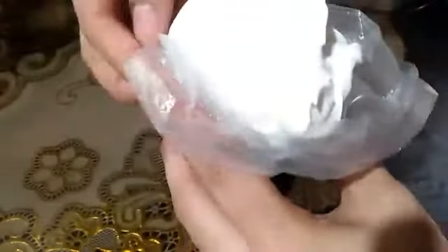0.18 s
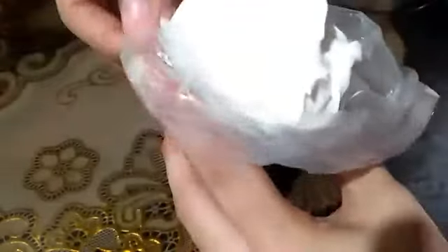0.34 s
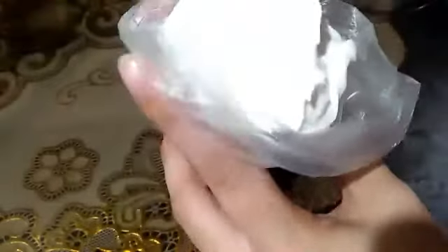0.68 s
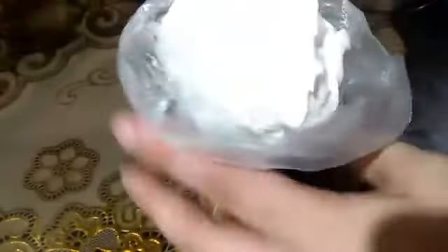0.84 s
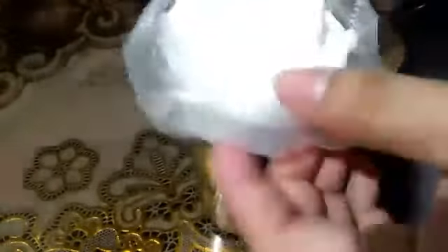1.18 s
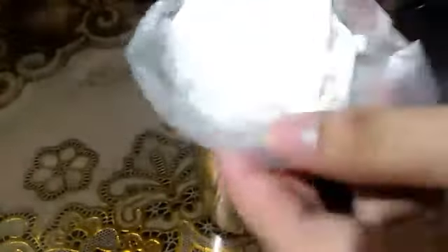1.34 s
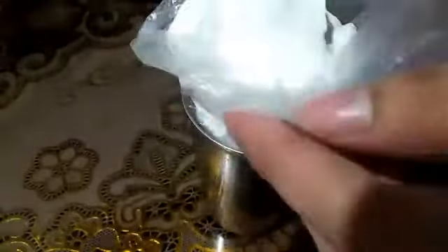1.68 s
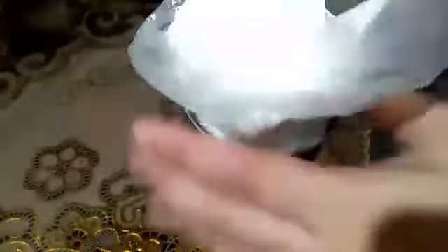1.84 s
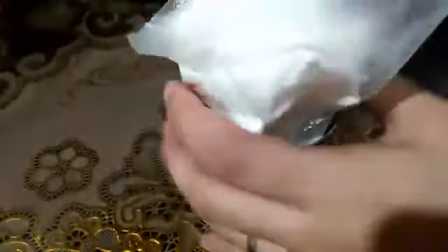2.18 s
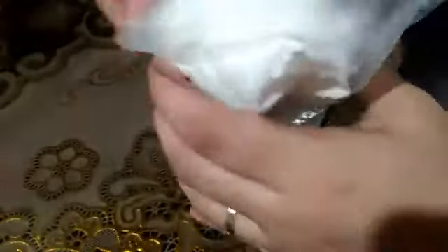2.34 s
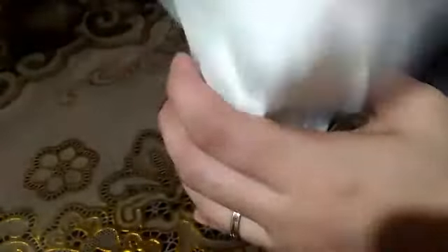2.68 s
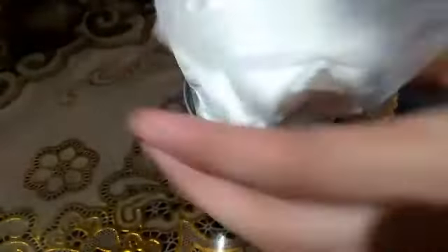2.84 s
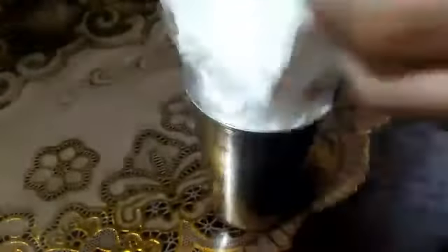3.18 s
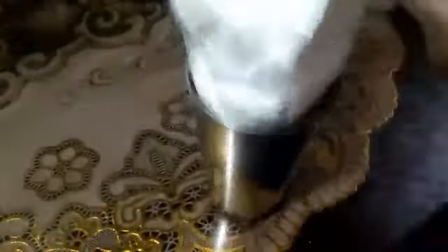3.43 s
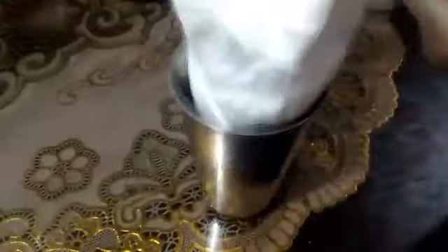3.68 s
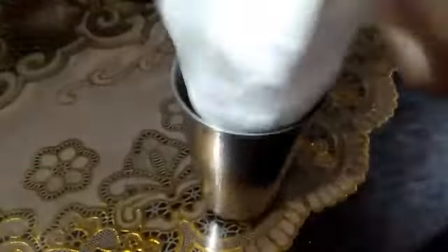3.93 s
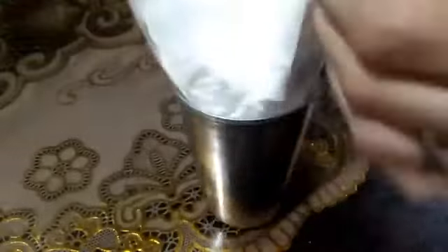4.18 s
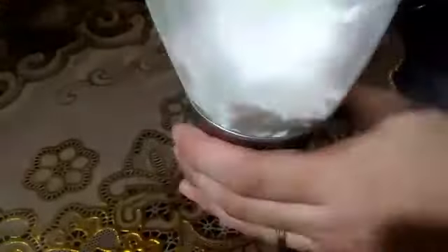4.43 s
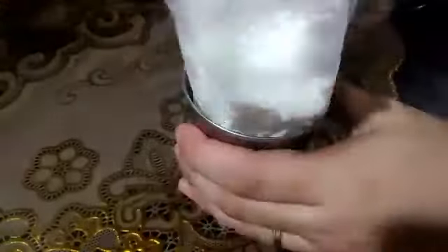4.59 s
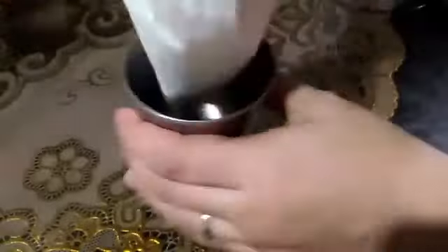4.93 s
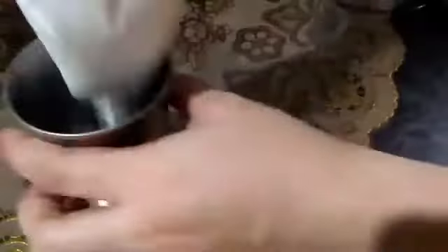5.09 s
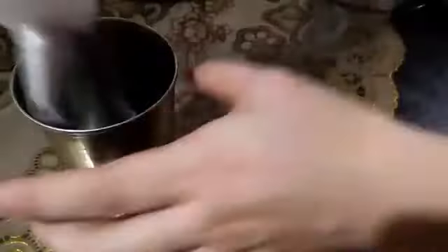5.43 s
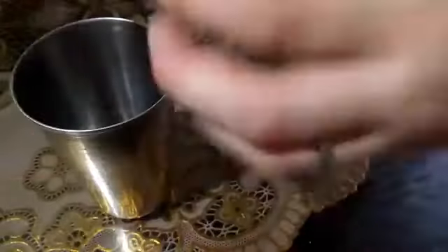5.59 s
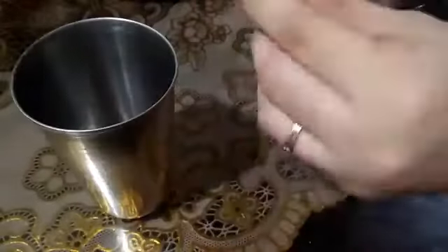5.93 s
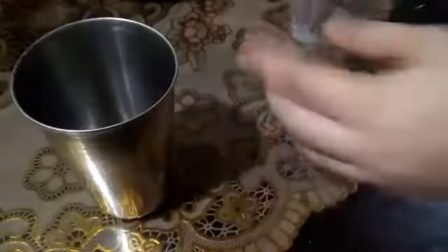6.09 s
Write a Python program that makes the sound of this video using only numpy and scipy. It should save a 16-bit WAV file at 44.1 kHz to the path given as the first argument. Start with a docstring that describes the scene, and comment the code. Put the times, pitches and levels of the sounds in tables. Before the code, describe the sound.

A close, dry sound of thin plastic film in a small quiet kitchen, with barely audible wavering room noise. From 0 to 1.9 seconds the film crackles in short, uneven bursts, bright and crisp, with sharp separate snaps and faint soft finger bumps. Around 2 seconds comes a hard, loud crumple with a low bump, then more scattered crinkles and snaps until 2.9. From about 3.1 to 4.05 the filled bag is gathered in a denser, deeper, smoother rustle, with dull mid-pitched bumps near 3.4 and 3.6. At 4.05 it settles with a soft low thud. Loose crackles follow, then from 4.5 to 5.3 a run of crunchy folds and scraping film, strongest near 5.0. At 5.35 to 5.5 the empty steel cup rocks with short, damped hollow knocks. After a near-silent gap, light crinkles and small snaps continue from 5.8 to the end.

```python
"""In a small, quiet kitchen a thin plastic piping bag of cream is unfolded from the rim of a steel cup,
gathered and pulled out. The film buckles in random swarms of clicked facets, with sharp single snaps and
short crumples. Fingers bump the cup, the bag settles with a thud and the empty cup rocks on the tablecloth:
all damped modes. A near reflection, a short tail and faint, wavering room noise lie around it."""
import sys
import numpy as np
from scipy import signal
from scipy.io import wavfile
from scipy.ndimage import uniform_filter1d

SR = 44100
rng = np.random.default_rng(int(sys.argv[2]) if len(sys.argv) > 2 else 0)


def file_out(sig):
    """Save sig as 16-bit WAV at sys.argv[1]."""
    # one column per channel
    cols = np.atleast_2d(sig).T
    # limit, then scale
    lim = np.clip(cols, -1, 1)
    pcm = np.round(lim * 32767).astype(np.int16)
    wavfile.write(sys.argv[1], SR, pcm)


N = 276943
TIME = np.arange(N) / SR

# Spectrum of the film's crisp crackle. Each row: frequency in Hz, relative level in dB.
CRACKLE_SPECTRUM = [(1500, -47.5), (3000, -18.5), (4500, -11), (6200, -7), (7600, 0), (9000, 5.5),
                    (10500, 1), (12000, -4), (14300, -11.5)]
# Spectrum of free film flexing. Each row: frequency in Hz, relative level in dB.
FLEX_SPECTRUM = [(40, -26), (200, -27), (450, -20), (750, -15.5), (1000, -2.5), (1450, 4), (1850, -4),
                 (2250, -1.5), (3200, -5.5), (4500, -10.5), (8000, -16)]


def rustle(crisp, flex, grip, drag, base_clicks_per_s=2200, base_flexes_per_s=900, full_db=-47,
           crowding=0.6, loose_db=4.0, smoothing=0.52):
    """The harder film is worked, the more facets buckle; loose film goes in clumps, gripped film slides evenly."""
    # Film pressed against the cream sounds deeper. Each row: frequency in Hz, relative level in dB.
    packed_spectrum = [(40, -19.5), (200, -15.5), (300, -7.5), (370, -12), (470, -3.5), (850, 2), (1450, 2),
                       (1950, -0.5), (2600, -5.5), (4000, -29), (8000, -28.5)]
    # Film taut over the rim sounds harder. Each row: frequency in Hz, relative level in dB.
    rim_spectrum = [(200, -30.5), (360, -10.5), (550, -10), (800, -9.5), (1500, -8), (2500, -8.5),
                    (3400, -0.5), (4500, -6.5), (6500, -7), (10000, -21)]

    busy = (crisp / amp(full_db)) ** crowding * (1 + grip) + 0.031
    click_rate = base_clicks_per_s * busy
    flex_rate = base_flexes_per_s * busy
    loose = 1 - smoothing * grip
    clumps = clumping(depth_db=5.0, length_s=0.006) ** loose
    bends = clumps * clumping(depth_db=1.5, length_s=0.0078)

    crackle = swarm(click_rate, loose_db * loose, clumps, CRACKLE_SPECTRUM, ripple_db=3.5, ripple_hz=1180,
                    ring_s=0.00066, flutter=1.36, fold_s=0.007)
    free = swarm(flex_rate, 5.1, bends, FLEX_SPECTRUM, ripple_db=9, ripple_hz=340.3,
                 ring_s=0.0016, flutter=1.2, fold_s=0.014)
    packed = swarm(flex_rate, 2.25, bends, packed_spectrum, ripple_db=3, ripple_hz=296.3,
                   ring_s=0.0017, flutter=1.37, fold_s=0.016)
    taut = swarm(flex_rate, 6.0, clumps, rim_spectrum, ripple_db=8.5, ripple_hz=582,
                 ring_s=0.001, flutter=0.75, fold_s=0.01)

    off_rim = np.sqrt(1 - grip) * free + np.sqrt(grip) * packed
    sheet = np.sqrt(1 - drag) * off_rim + np.sqrt(drag) * taut
    return amp(-0.54) * crisp * crackle + amp(-0.5) * flex * sheet


def handling(column, step_size=22, rise_db_per_s=1100.5, sag_db_per_s=14):
    """Loudness of moving film (column 0 crackle, 1 flexing): short moves, two long slides and crumples."""
    # Fingers work the film. Each row: start in seconds, length in seconds, nominal crackle and flexing in dB.
    moves = [(.005, 0.033, -61.5, -71.5), (.155, 0.0089, -58.5, -69.5), (0.267, 0.034, -66, -79),
             (0.303, 0.073, -55, -65.5), (0.433, 0.062, -53, -65), (0.531, .045, -53, -58.5),
             (0.596, 0.066, -58, -64.5), (0.709, 0.01, -63.5, -66), (0.773, 0.087, -65, -73),
             (0.881, 0.022, -53, -62), (0.955, .04, -65, -70), (1.009, 0.068, -59.5, -63),
             (1.098, 0.053, -46.5, -58), (1.158, 0.027, -55.5, -65), (1.208, 0.028, -53.5, -62),
             (1.276, 0.054, -56, -64.5), (1.341, 0.27, -52.5, -64.5), (1.653, 0.039, -55.5, -69.5),
             (1.797, 0.065, -54, -63), (1.981, 0.028, -48, -48), (2.068, 0.05, -53, -58.5),
             (2.154, 0.038, -58, -62), (2.356, 0.09, -74, -75.5), (2.452, .17, -52, -58),
             (2.657, 0.0086, -55.5, -64), (2.713, 0.077, -54, -56), (2.821, 0.052, -59, -60),
             (2.926, 0.015, -65, -65.5), (4.088, .012, -60, -67), (4.149, 0.025, -70, -72.5),
             (4.217, 0.086, -52, -57), (4.335, .075, -59, -67), (5.352, 0.058, -54.5, -63),
             (5.475, 0.011, -74, -79.5), (5.812, 0.045, -71, -75), (5.863, 0.022, -63.5, -71),
             (5.9, 0.074, -56.5, -64.5), (6.019, 0.078, -62, -69.5), (6.118, 0.038, -68, -84),
             (6.19, 0.062, -62, -65.5)]
    # Bag slides through the hand. Each row: time in seconds, nominal crackle and flexing in dB.
    gather = [(3.06, -64.5, -93), (3.096, -52.5, -63), (3.178, -49.5, -55), (3.202, -50, -43),
              (3.214, -56, -57), (3.59, -46.5, -47.5), (3.804, -48.5, -49), (3.928, -45, -47.5),
              (4.048, -55, -58), (4.085, -71.5, -73)]
    # Bag slides out over the rim. Each row: time in seconds, nominal crackle and flexing in dB.
    lift = [(4.44, -74, -74), (4.5, -70.5, -75.5), (4.525, -54.5, -57.5), (5.0, -55, -61.5),
            (5.11, -63, -74), (5.22, -49, -52.5), (5.285, -59.5, -63.5), (5.32, -71.5, -70)]
    # Whole folds give way; from 4.58 to 5.14 s they come in quick succession as the bag drags over the rim.
    # Each row: middle in seconds, Gaussian width in seconds, nominal crackle and flexing in dB.
    crumples = [(0.558, 0.0082, -45, -50.5), (1.027, 0.011, -47.5, -56.5), (1.134, .006, -52, -65.5),
                (1.852, 0.006, -48, -58), (1.985, 0.0044, -38, -42), (2.005, 0.0046, -42.5, -52),
                (2.069, 0.0039, -46.5, -47), (2.116, 0.0046, -55, -60.5), (2.534, 0.013, -47.5, -48.5),
                (2.948, 0.0031, -49.5, -53), (3.202, 0.0025, -52, -45), (3.42, 0.0052, -58, -44),
                (3.573, 0.0037, -62, -45), (4.262, 0.014, -47, -52), (4.408, 0.005, -52, -53.5),
                (4.58, 0.0022, -44, -56), (4.63, 0.0064, -44.5, -51), (4.699, 0.0099, -46, -55.5),
                (4.769, 0.0087, -44, -47), (4.828, 0.0074, -46, -48.5), (4.885, .015, -46, -50),
                (4.935, 0.0059, -44, -49.5), (4.957, 0.0063, -47, -47.5), (4.995, 0.0036, -40.5, -44),
                (5.023, 0.0091, -41.5, -45.5), (5.081, 0.0083, -45, -49), (5.143, 0.011, -45, -52.5)]
    # Decay after a move. One row: crackle, flexing, both in dB per second.
    fall_db_per_s = (523, 444.5)

    t = TIME[::step_size]
    power = np.zeros(len(t))
    # a move catches quickly, slackens, then dies away
    for start, length, *levels in moves:
        age = t - start
        rise = rise_db_per_s * np.minimum(age, 0)
        sag = sag_db_per_s * (np.clip(age, 0, length) - length / 2)
        fall = fall_db_per_s[column] * np.maximum(age - length, 0)
        power += amp(np.maximum(levels[column] + rise - sag - fall, -130)) ** 2
    for slide in (gather, lift):
        s, *levels = np.transpose(slide)
        power += amp(np.interp(t, s, levels[column], left=-np.inf, right=-np.inf)) ** 2
    for s, width_s, *levels in crumples:
        power += amp(levels[column]) ** 2 * np.exp(-0.5 * ((t - s) / width_s) ** 2)
    return np.interp(TIME, t, np.sqrt(power))


def holding():
    """How the bag is held from moment to moment: grip, and drag over the rim."""
    # Each row: time in seconds, grip on the filled part (0-1), share of flexing from film dragged over the rim (0-1).
    holds = [(0, 0, 0.25), (1.9, 0.16, 0), (1.989, 0.43, 0), (2.2, 0.18, 0.05), (2.6, 0.13, 0.02),
             (3.1, 0.11, 0.02), (3.35, 0.32, 0.03), (3.6, 0.99, 0.24), (4.04, 1, 0), (4.2, 0.4, 0.04),
             (4.5, 0.73, 0.15), (5.0, 0.4, 0.66), (5.35, 0.05, 0), (5.801, 0, 0.02)]
    s, *shares = np.transpose(holds)
    return [np.clip(np.interp(TIME, s, share), 0, 1) for share in shares]


def swarm(clicks_per_s, spread_db, clumps, points, ripple_db, ripple_hz, ring_s, flutter, fold_s,
          even_s=0.056, count=160):
    """Random clicks ring many facets, about half of them the fold in play, which changes about every fold_s."""
    facets = [facet(colour(points, ripple_db, ripple_hz), ring_s, flutter) for _ in range(count)]
    size_db = spread_db * np.minimum(rng.exponential(1, N), 3.5)
    sizes = clumps * amp(size_db) * rng.choice([-1, 1], N)

    fold_number = np.cumsum(rng.random(N) < 1 / (fold_s * SR))
    fold = rng.integers(0, count, N)[fold_number]
    other = rng.integers(0, count, N)
    which = np.where(rng.random(N) < 0.5, fold, other)

    out = np.zeros(N)
    for i in np.flatnonzero(rng.random(N) < clicks_per_s / SR):
        add(out, i / SR, sizes[i] * facets[which[i]])

    # work done on the film sets the mean power, however the clicks share it
    window = signal.windows.hann(int(even_s * SR) | 1)
    power = signal.oaconvolve(out ** 2, window / window.sum(), "same")
    return out / np.sqrt(abs(power) + 1e-6)


def clumping(depth_db, length_s):
    """Facets give way in clumps: a gain that flutters at random."""
    drift = uniform_filter1d(rng.standard_normal(N), max(int(length_s * SR), 1))
    return amp(depth_db * unit(drift))


def facet(tone, ring_s, flutter, size=1024):
    """One buckling facet: a click, then a brief flutter as the bend runs through the sheet; energy 1."""
    age = np.arange(size) / SR / ring_s
    tail = rng.standard_normal(size) * np.sqrt(age) * np.exp(-age)
    tail *= flutter / np.linalg.norm(tail)
    tail[0] += 1
    sound = signal.fftconvolve(tail, tone)[:size]
    return sound / np.linalg.norm(sound)


def snaps(rows, tick_gain_db=10.0, pop_gain_db=16, note_gain_db=18, note_t60_s=0.013,
          usual_flutter_s=0.00094, usual_db=-32, halving_db=9, give_s=0.00092):
    """Creases give and flip: a bright tick, shorter when harder, a sheet pop and the facet's own note."""
    out = np.zeros(N)
    for s, tick_db, pop_db, hz in rows:
        flutter_s = usual_flutter_s * 0.5 ** (max(tick_db - usual_db, 0) / halving_db)
        tick = facet(colour(CRACKLE_SPECTRUM, ripple_db=4.5, ripple_hz=1285), flutter_s, flutter=6.7)
        pop = facet(colour(FLEX_SPECTRUM, ripple_db=4, ripple_hz=392), ring_s=0.0023, flutter=3.6)
        note = ring(hz, note_t60_s, rise_s=0.00062)
        note /= np.linalg.norm(note)
        add(out, s + give_s, amp(tick_db + tick_gain_db) * tick)
        add(out, s + give_s, amp(pop_db + pop_gain_db) * pop)
        add(out, s + give_s, amp(pop_db + note_gain_db) * note)
    return out


def random_snaps(crisp, flex, grip, per_s=40, tick_offset_db=15, pop_offset_db=4.5, spread_db=3,
                grip_db=-5, low_hz=1300, high_hz=3000, above_db=-76, ceiling_db=-53):
    """Rows for snaps(): further creases flip at random while film moves, standing out where it hangs loose."""
    chance = rng.random(N)
    ticks, pops, pitches = rng.uniform(-1, 1, (3, N))
    rows = []
    for i in np.flatnonzero((chance < per_s / SR) & (crisp > amp(above_db))):
        film_db = 20 * np.log10([crisp[i], flex[i]])
        tick, pop = np.minimum(film_db, ceiling_db) + grip_db * grip[i]
        tick += tick_offset_db + spread_db * ticks[i]
        pop += pop_offset_db + spread_db * pops[i]
        hz = low_hz * (high_hz / low_hz) ** ((pitches[i] + 1) / 2)
        rows.append((i / SR, tick, pop, hz))
    return rows


def cup():
    """Damped modes: finger bumps, the filled bag's dull thud, and the cup rocking as the bag leaves it."""
    # Soft bumps of fingers on bag and cup. Each row: start in seconds, nominal level in dB, pitch in Hz.
    bumps = [(.288, -64, 302), (0.43, -46.5, 474), (.854, -59, 280), (.937, -51.5, 280),
             (1.029, -51.5, 318), (1.262, -51.5, 468.6), (1.388, -63.5, 283), (1.483, -60, 283),
             (1.598, -49, 409), (1.839, -50.5, 167), (1.982, -41, 129), (2.007, -48, 319),
             (2.074, -52, 140), (2.171, -53.5, 240), (2.357, -49.5, 474), (2.513, -48, 573),
             (2.873, -41.5, 438), (2.945, -45.5, 468), (3.427, -35.5, 590), (3.565, -33, 573),
             (3.623, -42, 571), (4.03, -46, 188.7), (4.477, -52, 450)]
    # Bag settles, with two small rebounds. Each row: start in seconds, nominal level in dB.
    thuds = [(4.052, -47), (4.135, -61), (4.184, -67)]
    # Cup knocks on the covered table. Each row: start in seconds, nominal level in dB, pitch factor.
    knocks = [(5.357, -44.5, 0.92), (5.367, -45.5, 0.95), (5.405, -59, 1), (5.454, -45.5, 0.92),
              (5.469, -43.5, 1.02), (5.491, -45.5, 0.95)]
    # Modes of the cup. Each row: frequency in Hz at pitch factor 1, relative level in dB, t60 in seconds.
    cup_modes = [(778, 1, 0.07), (907, 1, 0.048), (1130, -4, 0.039), (1370, 2.5, 0.02)]

    out = np.zeros(N)
    for s, db, hz in bumps:
        bump = ring(hz, t60_s=0.024, rise_s=0.0016)
        bump += 0.4 * ring(hz * 2.4, t60_s=0.013, rise_s=0.0013)
        add(out, s, amp(db) * scuffed(bump, scuff=0.6, scuff_s=0.028))
    for s, db in thuds:
        thud = ring(54, t60_s=0.25, rise_s=0.0033) + 0.28 * ring(130, t60_s=0.13, rise_s=0.003)
        add(out, s, amp(db) * thud)
    for s, db, pitch in knocks:
        knock = sum(amp(level) * ring(hz * pitch, t60_s, rise_s=0.0026) for hz, level, t60_s in cup_modes)
        add(out, s, amp(db) * scuffed(knock, scuff=0.54, scuff_s=0.003))
    return out


def ring(hz, t60_s, rise_s):
    """One damped mode, softly struck."""
    t = np.arange(SR // 2) / SR
    return np.sin(2 * np.pi * hz * t) * 1000 ** (-t / t60_s) * (1 - np.exp(-t / rise_s))


def scuffed(sound, scuff, scuff_s, size=2048):
    """A contact is one blow followed by a short scrape."""
    force = rng.standard_normal(size) * np.exp(-np.arange(size) / SR / scuff_s)
    force *= scuff / np.linalg.norm(force)
    force[0] += 1
    return signal.fftconvolve(sound, force) / np.hypot(1, scuff)


def kitchen(x, wet_db=-17, t60_s=0.038, reflection_db=-18, reflection_s=0.0105):
    """A near reflection and a short, faint tail of decaying noise."""
    t = np.arange(SR // 3) / SR
    tail = rng.standard_normal(len(t)) * 1000 ** (-t / t60_s) * (t > 0.004)
    tail *= amp(wet_db) / np.linalg.norm(tail)
    tail[round(reflection_s * SR)] += amp(reflection_db)
    return x + signal.oaconvolve(x, tail)[:N]


def quiet(level_db=-80, waver_db=4.0, waver_below_hz=2200):
    """Faint room noise, wavering in narrow patches, mostly in its lower part."""
    # Spectrum of the room's quiet. Each row: frequency in Hz, relative level in dB.
    room_spectrum = [(20, -15), (55, 2.5), (90, 1.5), (150, -12), (300, -11), (450, -3.5), (620, -2.5),
                     (900, 1), (1300, -5), (1900, -4.5), (2600, -14.5), (5000, -25), (9500, -24),
                     (15000, -20)]
    air = signal.oaconvolve(rng.standard_normal(N), colour(room_spectrum, size=8192))[:N]
    hz, _, z = signal.stft(air, SR, nperseg=1024, noverlap=768)
    patches = uniform_filter1d(rng.standard_normal(z.shape), size=3, axis=0)
    patches = unit(uniform_filter1d(patches, size=9, axis=1))
    z = z * amp(waver_db * patches / (1 + (hz[:, None] / waver_below_hz) ** 2))
    wavering = signal.istft(z, nperseg=1024, noverlap=768)[1][:N]
    return amp(level_db) * unit(wavering)


def colour(points, ripple_db=0, ripple_hz=1000, size=2048):
    """Causal impulse response of energy 1: the given spectrum, with chance resonances about ripple_hz wide."""
    hz, db = np.transpose(points)
    bins = abs(np.fft.fftfreq(size, 1 / SR))
    ripple = np.interp(bins / ripple_hz + rng.random(), np.arange(256), rng.standard_normal(256))
    spectrum_db = np.interp(np.log(bins + 1), np.log(hz), db)
    log_gain = np.log(amp(spectrum_db + ripple_db * ripple))
    minimum_phase = np.exp(np.conj(signal.hilbert(log_gain)))
    response = np.fft.ifft(minimum_phase).real[:size // 2]
    return response / np.linalg.norm(response)


def amp(db):
    """Decibels to gain."""
    return 10 ** (np.asarray(db) / 20)


def unit(x):
    """Scales to rms 1."""
    return x / np.sqrt(np.mean(x ** 2) + 1e-20)


def add(mix, s, sound):
    """Mixes a sound in at s seconds."""
    part = mix[max(round(s * SR), 0):][:len(sound)]
    part += sound[:len(part)]


def scene():
    """Bag and cup in the kitchen."""
    # Creases that flip at set times, from hard snaps to faint ticks. Each row: time in seconds, nominal tick
    # and pop levels in dB, facet pitch in Hz.
    set_snaps = [(0.1538, -39.5, -59.5, 1780), (0.2392, -51.5, -68.5, 2300), (0.3108, -30, -50.5, 2520),
                 (0.3332, -46, -64, 1410), (0.3686, -32.5, -58, 3440), (0.4328, -31.5, -50.5, 2050),
                 (0.6573, -24, -64, 1440), (0.7104, -36.5, -58, 1560), (0.7841, -56, -70, 3910),
                 (0.8214, -33, -59.5, 1150), (0.9612, -39, -67, 1860), (1.034, -29, -59, 1590),
                 (1.0961, -28.5, -54, 1620), (1.1333, -26, -45, 2040), (1.1707, -39, -57, 4310),
                 (1.391, -27, -57, 1020), (1.4599, -31, -60, 1740), (1.4758, -39, -46.5, 1380),
                 (1.5525, -26.5, -54, 2580), (1.8027, -36, -50, 1580), (1.8476, -28.5, -52, 1704),
                 (1.9521, -39, -48, 1590), (2.0637, -29, -58, 1500), (2.0817, -29, -47, 1450),
                 (2.1098, -32.5, -63, 1357), (2.152, -26.5, -59, 1998), (2.4115, -36, -55, 1600),
                 (2.4642, -36, -57, 2795), (2.6614, -32, -49.5, 3160), (2.684, -34, -69, 1198),
                 (2.7656, -23, -60, 2520), (2.874, -32, -43, 1230), (2.897, -37, -47.5, 1450),
                 (2.9278, -32, -53, 1190), (2.9452, -28.5, -45.5, 1240), (3.1553, -40, -47.5, 2280),
                 (4.1323, -42.5, -71, 1390), (4.2118, -31, -62.5, 1760), (4.2155, -30.5, -54.5, 1900),
                 (4.3251, -36, -74, 2960), (4.3494, -32.5, -52.5, 1186), (4.3996, -34.5, -49, 1400),
                 (4.4597, -34, -61, 1440), (4.507, -35, -71, 1460), (4.5547, -24.5, -51.5, 2140),
                 (4.5658, -30, -45, 2230), (4.6061, -30, -66, 1530), (4.6813, -28.5, -50, 1480),
                 (5.2961, -27, -50.5, 1460), (5.3267, -32.5, -54.5, 1024), (5.5667, -50, -72, 1230),
                 (5.588, -49.5, -68, 2790), (5.8304, -39.5, -67.5, 1630), (5.8636, -36.5, -58, 2250),
                 (5.9427, -28, -54, 2280), (5.9643, -29, -54, 1410), (6.0527, -31, -50, 2300),
                 (6.0778, -31, -49, 2300), (6.1934, -34.5, -70, 2640), (6.2606, -37, -52.5, 1484)]
    crisp, flex = (handling(column) for column in range(2))
    grip, drag = holding()
    bag = rustle(crisp, flex, grip, drag)
    bag += snaps(set_snaps)
    bag += snaps(random_snaps(crisp, flex, grip))
    return (kitchen(bag + cup()) + quiet())[None]


def record(dry, edge_hz=14500):
    """The recorder's band limit: a linear-phase low-pass."""
    low_pass = signal.firwin(301, edge_hz, window=("kaiser", 8), fs=SR)
    return signal.oaconvolve(dry, low_pass[None], "same")


dry = scene()
out = record(dry)
file_out(out)
```